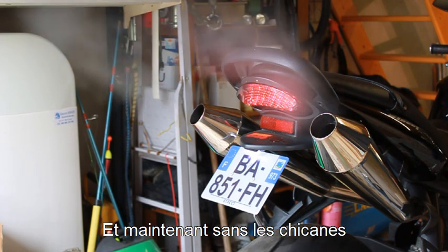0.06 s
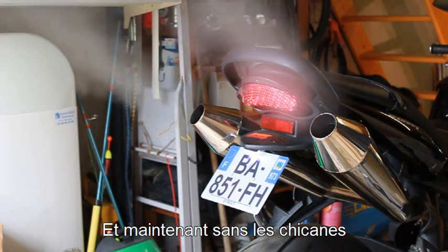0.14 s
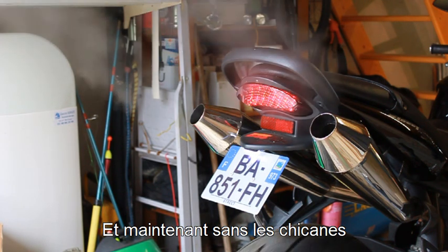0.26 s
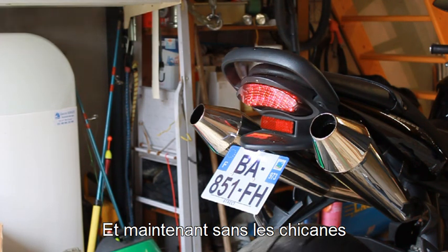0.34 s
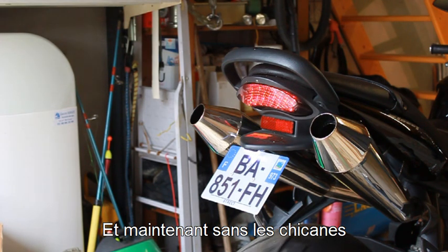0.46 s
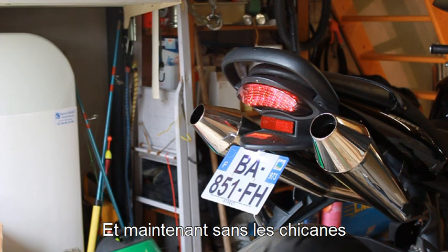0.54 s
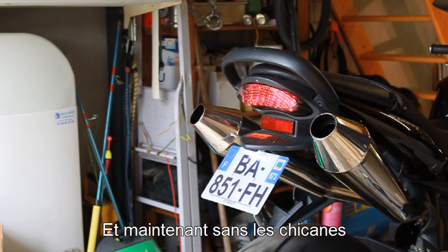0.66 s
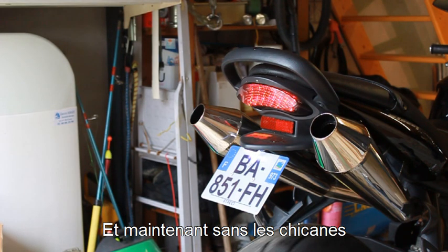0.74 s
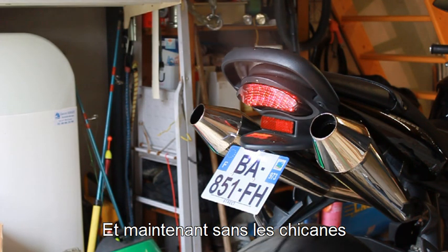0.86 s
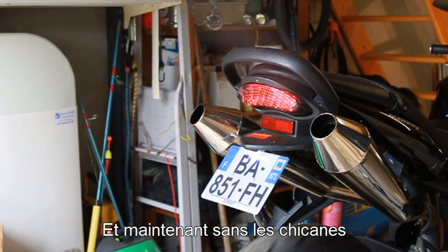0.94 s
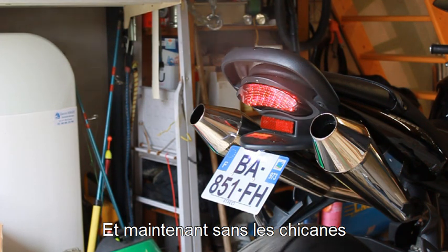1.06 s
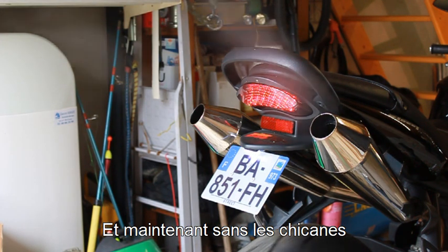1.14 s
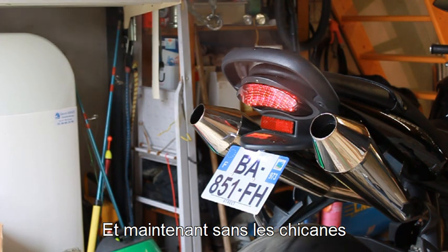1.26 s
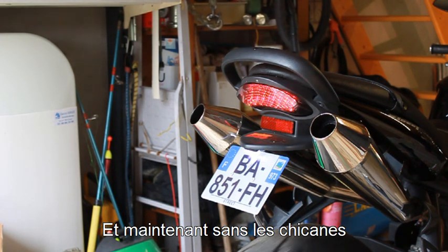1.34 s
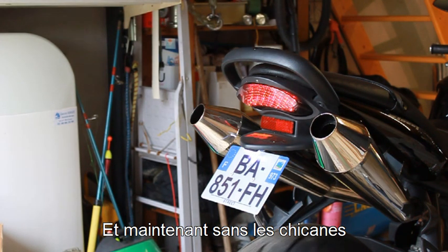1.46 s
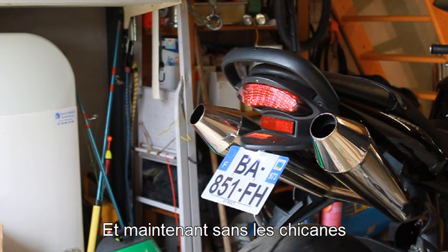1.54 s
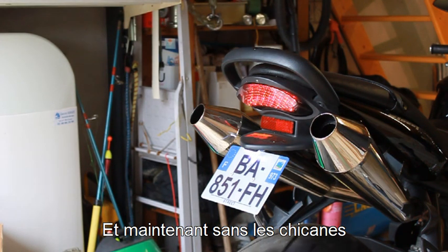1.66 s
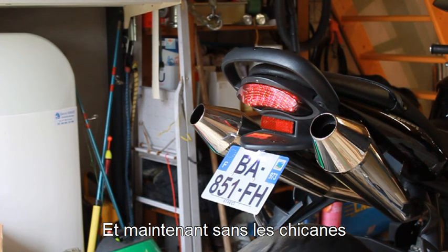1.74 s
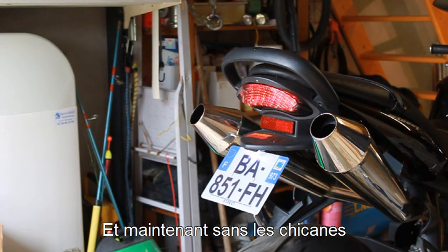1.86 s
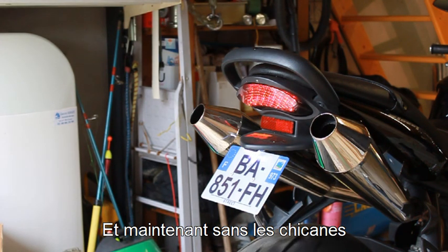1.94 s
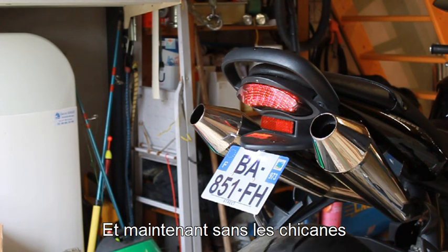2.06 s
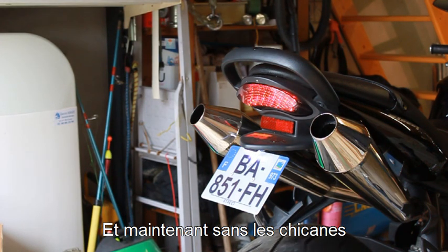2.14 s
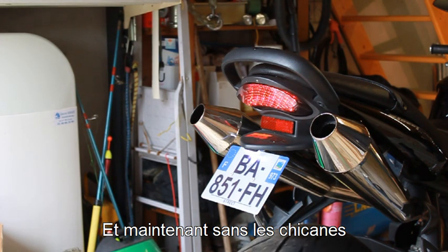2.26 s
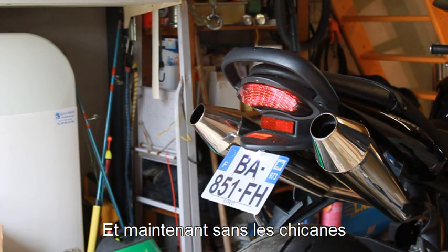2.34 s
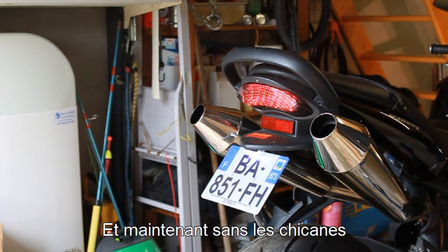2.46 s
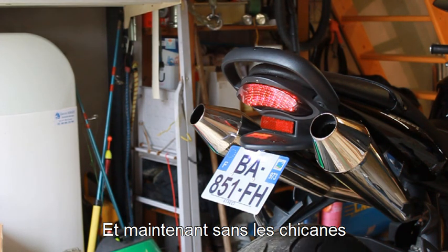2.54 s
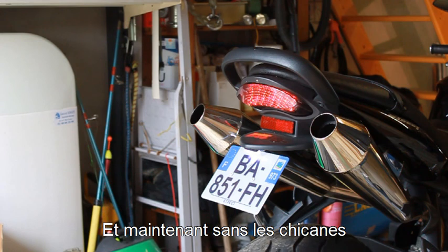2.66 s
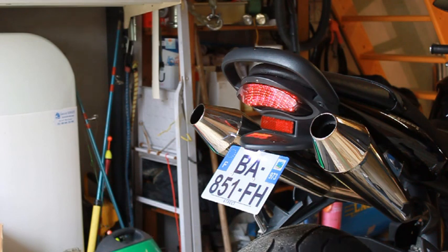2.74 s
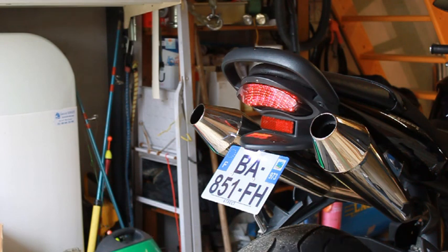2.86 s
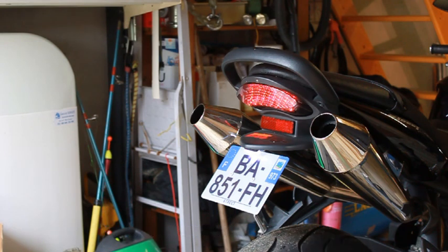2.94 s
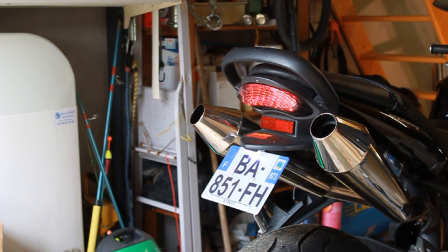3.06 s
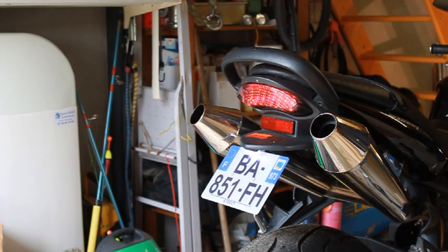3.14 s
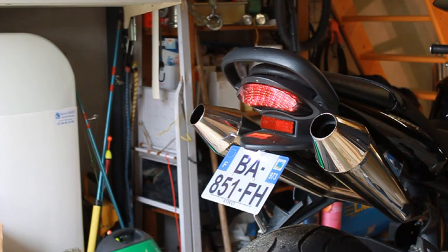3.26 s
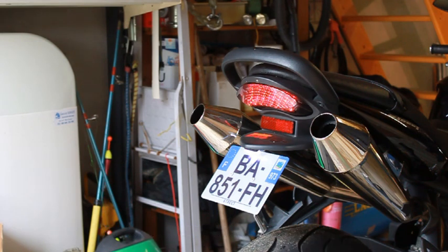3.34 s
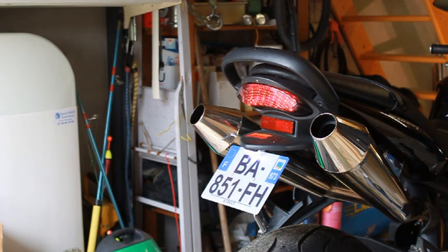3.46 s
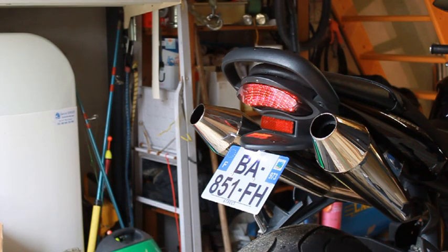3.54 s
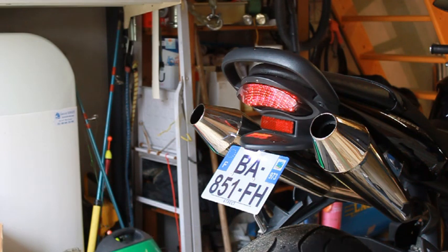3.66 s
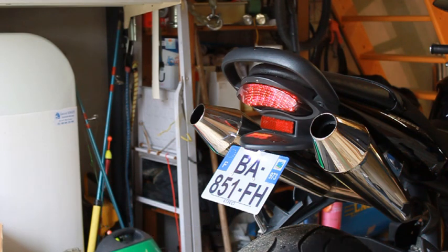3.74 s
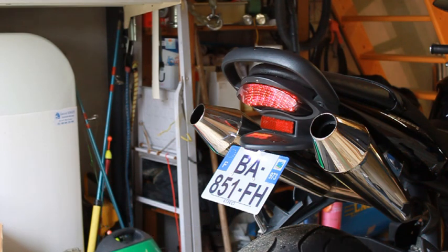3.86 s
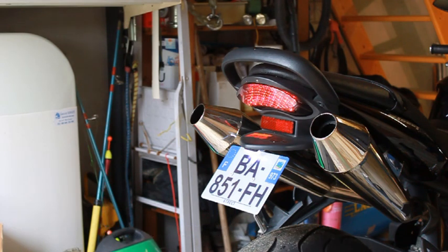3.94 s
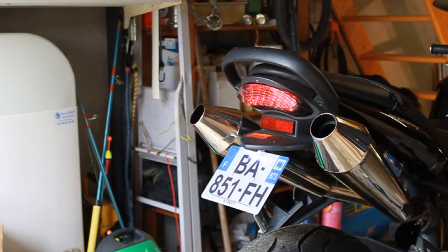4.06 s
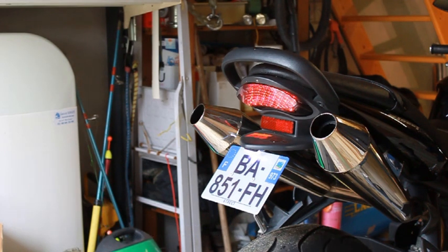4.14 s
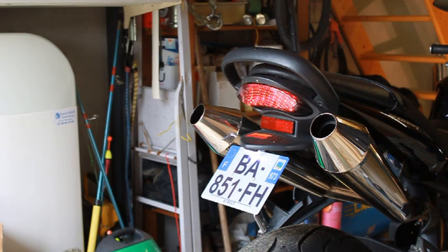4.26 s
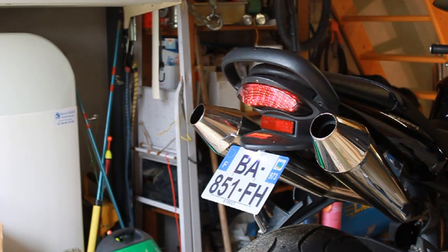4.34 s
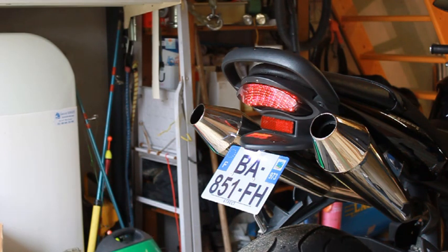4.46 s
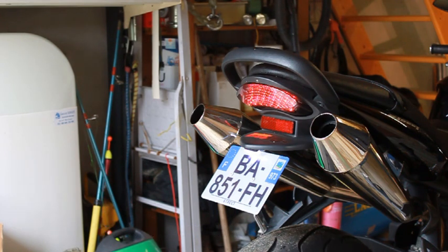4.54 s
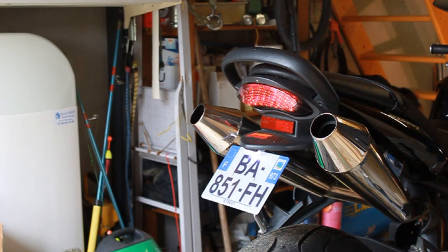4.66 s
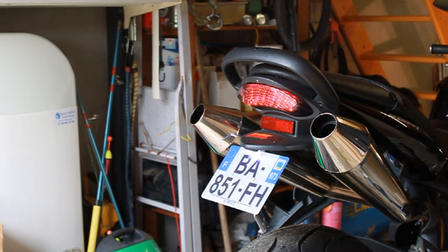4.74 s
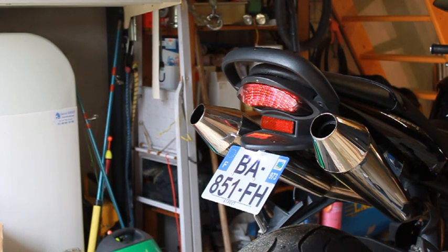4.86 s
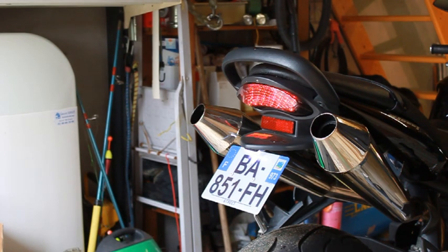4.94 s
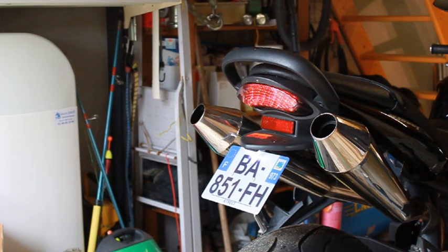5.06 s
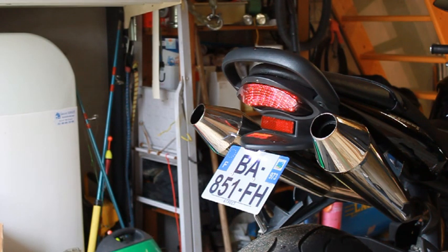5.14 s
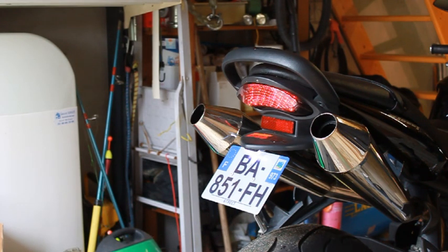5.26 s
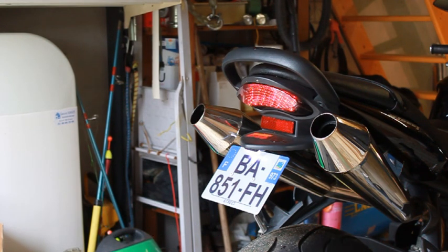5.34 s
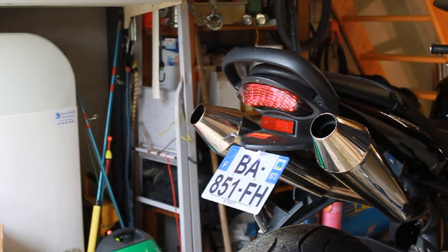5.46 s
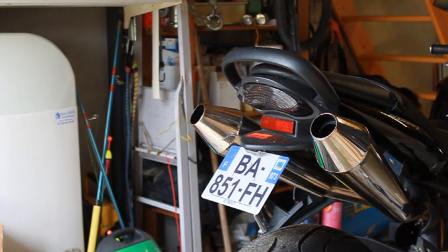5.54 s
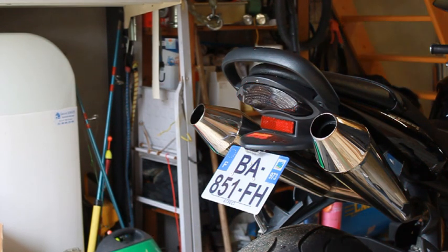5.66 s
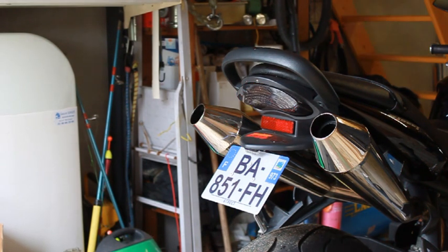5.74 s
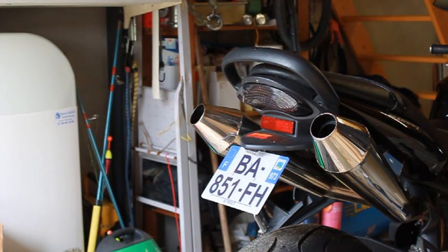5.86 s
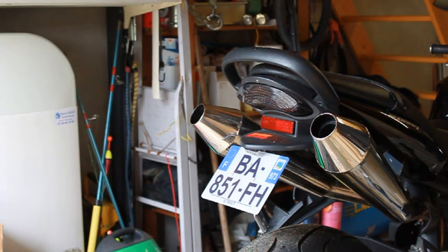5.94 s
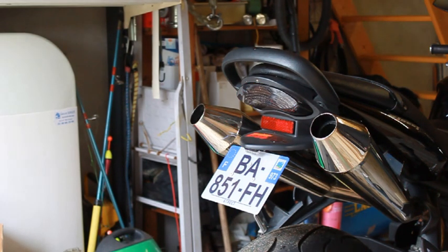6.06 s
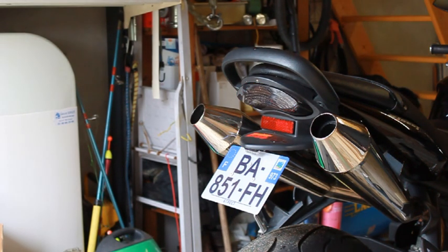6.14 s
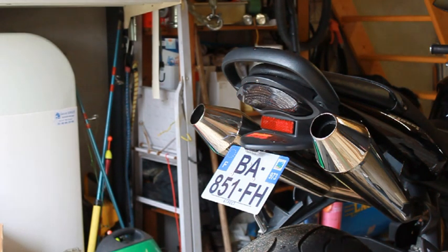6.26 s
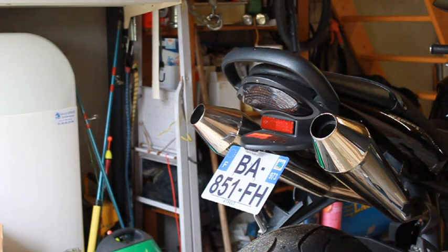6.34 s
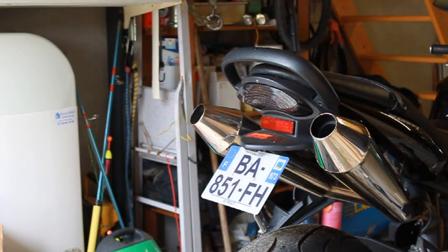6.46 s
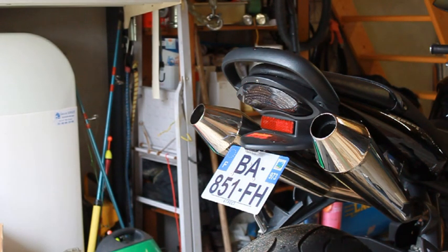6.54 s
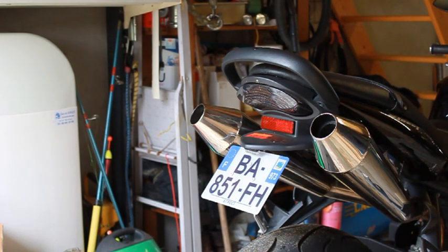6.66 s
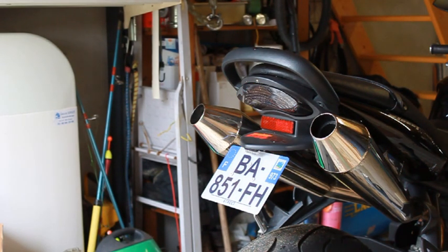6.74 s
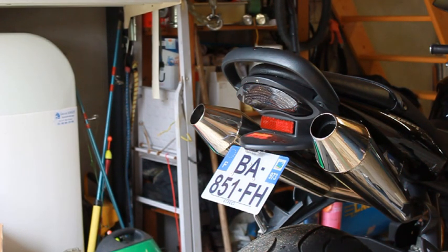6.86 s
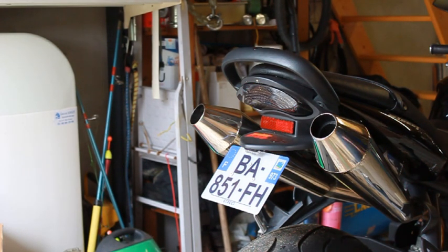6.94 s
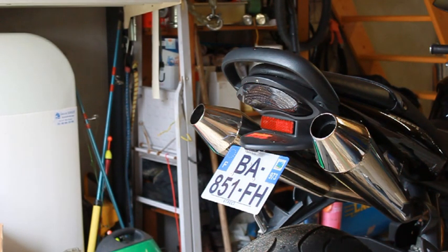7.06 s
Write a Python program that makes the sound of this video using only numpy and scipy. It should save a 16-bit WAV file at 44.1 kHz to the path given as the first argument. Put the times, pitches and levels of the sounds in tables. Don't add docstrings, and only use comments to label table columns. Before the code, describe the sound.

A three-cylinder motorcycle with open pipes, heard very close in a small reverberant garage. At 0 s it is already fast, the revs sinking until about 0.25 s. At 0.3 s the throttle snaps open: a raw, rasping roar climbs to its peak near 0.57 s, flattening the microphone, with hissing bursts of gas. From 0.8 s it coasts down, gears whining downward, and between 1.2 and 1.5 s six irregular pops and bangs crack in the pipes. By about 2 s it settles into a deep, lumpy idle, roughly 35 beats a second, hissing and buzzing with loose covers. At 5.63 s the ignition is cut; the beat sags into a low fluttering wheeze, and at 5.81 s a hard metallic knock chatters for a tenth of a second. Then near quiet: faint hum, thin squeaks, cloth rustles from 6.3 s, creaks, and a small tick with a sharper rustle near 7 s.

```python
import sys
import numpy as np
from scipy import signal
from scipy.fft import irfft
from scipy.io import wavfile
from scipy.ndimage import uniform_filter1d

SR = 44100
rng = np.random.default_rng(int(sys.argv[2]) if len(sys.argv) > 2 else 0)


def dump_mix(stems):
    frames = np.atleast_2d(stems).T
    limited = np.clip(frames, -1, 1)
    pcm = np.round(limited * 32767).astype(np.int16)
    wavfile.write(sys.argv[1], SR, pcm)


def how_loud(loudness_db):
    steps = np.asarray(loudness_db, float) / 20
    return 10 ** steps


N = 313530
T = np.arange(N) / SR

IDLE_HZ = 35.03
KEY_S, DYING_DB_PER_S = 5.633, 100
# frequency in Hz, level in dB per Hz.
RASP = [(280, -41), (480, 0.5), (937, -2), (1110, 2.5), (1270, -2.5), (1760, -20), (2200, -26),
        (2860, -28.5), (4840, -120)]


def evened(x):
    return x / np.sqrt(np.mean(x ** 2) + 1e-20)


def levelled(x, s):
    span = int(s * SR)
    power = uniform_filter1d(uniform_filter1d(x ** 2, span), span)
    return x / np.sqrt(abs(power) + 1e-3 * power.mean())


def curves(rows):
    s, *columns = np.transpose(rows)
    return [np.interp(T, s, c) for c in columns]


def read(points, hz):
    f, value = np.transpose(points)
    return np.interp(np.log(hz + 1), np.log(f + 1), value)


def humps(rows):
    return sum(np.exp(-((T - s) / length) ** 2) * np.array(heights)[:, None] for s, length, *heights in rows)


def gate(s, length, edge):
    opening = np.clip((T - s) / edge, 0, 1)
    closing = np.clip((s + length - T) / (3 * edge) + 1, 0, 1)
    return opening * closing


def clicks(events):
    out = np.zeros(N)
    for s, db in events:
        out[round(s * SR)] = how_loud(db)
    return out


def colour(x, points):
    db = np.maximum(read(points, abs(np.fft.fftfreq(8192, 1 / SR))), -100)
    log_gain = signal.hilbert(db * np.log(10) / 20)
    response = np.fft.ifft(np.exp(np.conj(log_gain))).real[:4096]
    return signal.oaconvolve(x, response)[:N]


def resonate(x, hz, width):
    turn = np.exp(2j * np.pi * np.cumsum(hz * np.ones(N)) / SR)
    r = np.exp(-np.pi * width / SR)
    return 2 * (turn * signal.lfilter([1 - r], [1, -r], x / turn)).real


def garage(x):
    # frequency in Hz, reverberation time in s.
    walls = [(100, 0.17), (400, 0.79), (2000, 0.38), (8000, 0.18)]
    taps, at = np.zeros(SR), np.arange(200, SR - 20, 20)
    taps[at + rng.integers(0, 20, len(at))] = rng.choice([-1., 1.], len(at))
    hz, t, z = signal.stft(taps, SR, nperseg=512)
    decay = how_loud(-60 * t / read(walls, hz)[:, None])
    tail = signal.istft(z * decay, SR, nperseg=512)[1]
    return signal.fftconvolve(x, tail / np.linalg.norm(tail))[:N]


def pipes(x):
    # frequency in Hz, width in Hz, level in dB.
    modes = [(67.8, 33, -4.5), (106.7, 13, 4), (135.6, 26.5, 2), (175.7, 12, 1.5), (215.64, 20.4, 5),
             (248.7, 24.3, 3.5), (280.6, 8.8, 1.5), (316.2, 28, -2), (364.5, 38, -3.5), (408.4, 51, -12.5)]
    # frequency in Hz, width in Hz, depth in dB.
    nulls = [(190, 12, -24), (234, 9, -14), (271, 8, -12), (340, 9, -12)]
    # frequency in Hz, delay in s.
    lag = [(50, .016), (70, .011), (88, .011), (123, .021), (158, .0215), (194, .0065), (229, .035),
           (264, .011), (299, .0105), (334, .0137), (370, .002), (405, .012)]
    hz = abs(np.fft.fftfreq(32768, 1 / SR))
    power = sum(how_loud(2 * db) / (1 + (2 * (hz - f) / width) ** 2) ** 2 for f, width, db in modes)
    for f, width, db in nulls:
        power = power * (1 - (1 - how_loud(2 * db)) / (1 + (2 * (hz - f) / width) ** 2))
    power = power / (1 + (hz / 440) ** 16) + 1e-9
    causal = np.exp(np.conj(signal.hilbert(np.log(power) / 2)))[:16385]
    late = np.exp(-2j * np.pi * np.cumsum(read(lag, hz[:16385])) * hz[1])
    before = x[4000:0:-1]
    response = irfft(causal * late)[:12000]
    return signal.oaconvolve(np.append(before, x), response)[4000:][:N]


def quiet():
    # frequency in Hz, level in dB per Hz.
    hum_colour = [(18, -61), (30, -27.5), (151, -15.5), (221, -10.5), (324, -28), (402, -6.5), (467, -14),
                  (600, -8.5), (809, -12), (1600, -15.5), (2080, -54), (3520, -120)]
    # frequency in Hz, level in dB per Hz.
    rustle_colour = [(710, -12.5), (1200, -10), (2980, -12.5), (3320, -13), (3660, -12.5), (5590, -14.5),
                     (5780, -17), (16000, -21)]
    # frequency in Hz, width in Hz, level in dB.
    hum_peaks = [(226, 20, -1), (360, 14, 3), (410, 14, -2), (493, 16, -3), (575, 14, 1)]
    # start in s, length in s, level in dB.
    brushes = [
        (6.315, .15, -70),
        (6.385, 0.018, -70),
        (6.485, .065, -59),
        (6.93, 0.045, -63),
        (7.031, 0.011, -55),
        (7.046, .045, -56),
    ]
    # start in s, hum in dB, rustle in dB, decay in dB a second.
    settling = [
        (5.62, -40.5, -47, 76),
        (5.815, -41, -35, 147),
    ]
    # start in s, length in s, start pitch in Hz, end pitch in Hz, level in dB.
    squeaks = [
        (6.177, 0.17, 8700, 8400, -81.5),
        (6.264, .05, 7230, 7600, -74),
        (6.41, 0.099, 4180, 4080, -70),
        (6.544, 0.17, 4000, 3930, -77),
        (6.31, 0.039, 900, 880, -64),
        (6.37, .05, 1050, 1033, -66),
        (6.673, 0.087, 720, 722, -68),
        (6.985, .035, 630, 610, -52),
    ]
    hum_size = how_loud(-70) + how_loud(-67) * gate(6.52, 1, 0.027)
    rustle_size = how_loud(-73.5) + how_loud(-71.5) * gate(6.32, 1, 0.0077)
    rustle_size = rustle_size + sum(how_loud(db) * gate(s, length, .004) for s, length, db in brushes)
    for s, low_db, high_db, fall_db in settling:
        dying = gate(s, 1, .004) * how_loud(-fall_db * np.maximum(T - s, 0))
        hum_size = hum_size + how_loud(low_db) * dying
        rustle_size = rustle_size + how_loud(high_db) * dying

    noise = rng.standard_normal((3, N))
    tones = sum(how_loud(db) * evened(signal.lfilter(*signal.iirpeak(hz, hz / width, SR), noise[0]))
                for hz, width, db in hum_peaks)
    hum = evened(evened(colour(noise[0], hum_colour)) + how_loud(-3) * evened(tones))
    grains = how_loud(0.83 * evened(uniform_filter1d(noise[2], 150)))
    out = hum_size * hum + rustle_size * evened(colour(grains * noise[1], rustle_colour))
    for s, length, hz, end_hz, db in squeaks:
        u = np.arange(0, 1, 1 / (length * SR))
        phase = 2 * np.pi * np.cumsum(hz + (end_hz - hz) * u) / SR
        out[round(s * SR):][:len(u)] += how_loud(db) * np.sin(np.pi * u) ** 0.21 * np.sin(phase)
    return out


def wheeze():
    u = np.clip((T - 5.62) / 0.48, 0, 1)
    noise = rng.standard_normal(N)
    breath = evened(resonate(resonate(noise, 40, 18), 40, 18))
    flutter = how_loud(-32 - 22 * u) * np.sin(np.pi * u) ** 1.5 * breath
    low_band = signal.butter(2, [45, 100], "band", fs=SR, output="sos")
    return flutter + how_loud(-74) * evened(signal.sosfilt(low_band, noise))


def kick_back():
    # time in s, peak in dB.
    knocks = [
        (5.8105, -19.5),
        (5.8145, -13.5),
        (5.8294, -22.5),
        (5.8444, -20.5),
        (5.8594, -20),
        (5.8794, -19.5),
        (5.8944, -21.5),
        (5.9144, -36.5),
        (7.029, -45.5),
    ]
    # frequency in Hz, level in dB, decay time to -60 dB in s (at most 0.08 is
    casing = [(1010, -15.5, 0.22), (1580, -5.5, 0.38), (1780, -9, 0.55), (1870, -17, 0.59),
              (2120, -14.5, 0.39), (2280, -20.5, 1.7), (2330, -14.5, 0.056), (2507, -3, 0.17),
              (2960, -50, 5.0), (3340, -20, 0.22), (3470, -12.5, 0.087), (4285, -40, 5.0),
              (4958, -31.5, 0.92), (7400, -21.5, 0.24)]
    # frequency in Hz, level in dB per Hz.
    clatter = [(180, -51.5), (300, -40.5), (433, -8.5), (801, -43), (946, -9), (1970, 1), (4440, -12),
               (5430, -21), (12700, -30), (16000, -32.5)]
    blows, t = clicks(knocks), T[:8000]
    ring = sum(how_loud(db - 60 * t / min(t60, .08)) * np.sin(2 * np.pi * hz * t) for hz, db, t60 in casing)
    rung = signal.oaconvolve(blows, ring)[:N]
    shaking = signal.oaconvolve(blows, how_loud(-60 * t / 0.16))[:N]
    shake = colour(shaking * rng.standard_normal(N), clatter)
    both = how_loud(-4) * evened(rung) + evened(shake)
    both = both + how_loud(-11.5) * garage(both)
    return how_loud(np.max(knocks, 0)[1] + 2.0) * both / abs(both).max()


def backfires():
    # time in s, peak in dB.
    pops = [
        (1.182, -11),
        (1.265, -7),
        (1.366, -15.5),
        (1.445, -8.5),
        (1.464, -13),
        (1.489, -7.5),
    ]
    bangs = clicks(pops)
    thud = np.roll(pipes(bangs), -round(.011 * SR))
    burst = signal.lfilter([1], [1, -.996], bangs)
    ragged = colour(burst * rng.standard_normal(N), RASP)
    both = how_loud(1.5) * thud / abs(thud).max() + how_loud(-7) * ragged / abs(ragged).max()
    return how_loud(np.max(pops, 0)[1]) * both


def crank():
    # time in s, rate in firings a second.
    blip = [
        (0, 216),
        (.1, 197),
        (.26, 152),
        (.315, 158),
        (.4, 208),
        (.52, 300),
        (.57, 316),
        (.62, 303),
        (.8, 251.5),
    ]
    # time in s, level in dB.
    burn = [(0, -9.5), (.12, -7.5), (.25, -15.5), (.31, 5.5), (.4, 1), (.5, 14), (.57, 5.5), (.63, 3),
            (.93, -4.5), (1.1, -11.5), (1.2, -17), (1.5, -21), (1.86, -22), (1.97, -17.5), (2.03, -23.5),
            (2.08, -19.5), (2.8, -16.5), (5.6, -17)]
    # time in s, length in s, speed change in Hz, burn
    # change in dB.
    hunts = [(2.24, 0.077, -0.75, -0.5), (2.36, 0.058, 0.81, 1), (2.98, 0.091, 0.11, 1.5),
             (3.24, 0.11, 1.04, 3), (3.63, 0.074, -1.02, -0.5), (3.8, 0.094, 1.02, 2), (4.45, .2, -0.27, 1),
             (4.68, 0.071, 0.21, 2), (4.86, .09, .9, 1.5), (5.28, 0.071, 0.63, 3), (5.42, 0.047, -1.7, 0),
             (5.56, 0.069, 1.84, 2), (5.665, 0.039, -0.47, -6.5), (5.78, 0.042, -0.17, -11)]
    drag_per_s, friction_hz, spin_down_hz_per_s = 1.3, 20, 135
    hunt_hz, hunt_db = humps(hunts)
    shut_s, shut_hz = blip[-1]
    coast = (shut_hz + friction_hz) * np.exp(-drag_per_s * (T - shut_s)) - friction_hz
    rate_hz = np.where(T < shut_s, curves(blip)[0], np.maximum(coast, IDLE_HZ + hunt_hz))
    off = np.maximum(T - KEY_S, 0)
    rate_hz = np.maximum(rate_hz - spin_down_hz_per_s * off, 5)
    return rate_hz, curves(burn)[0] + hunt_db - DYING_DB_PER_S * off


def gears(turns, rate_hz):
    # multiple of the firing rate, fuzz as a share of pitch, level in dB.
    meshes = [(31.4, .055, 0), (63.5, .045, 0), (94, .04, -16)]
    whine = 0
    for multiple, fuzz, db in meshes:
        a, b = rng.standard_normal((2, 8000))
        wander = np.interp(turns * multiple * fuzz * 2, np.arange(8000), a + 1j * b)
        tone = (wander * np.exp(2j * np.pi * multiple * turns)).real
        audible = np.clip((6000 + 110000 / multiple - multiple * rate_hz) / 5500, 0, 1)
        whine = whine + how_loud(db) * evened(tone) * audible
    return whine * (1 + .2 * np.cos(2 * np.pi * turns / 3) + .3 * np.cos(2 * np.pi * turns))


def engine():
    cylinder_db = [1.3, -.3, -1]
    # frequency in Hz, level in dB per Hz.
    hiss_fast = [(880, -46), (1500, -2), (1830, -9), (2390, -2), (2640, -3.5), (4370, -6.5), (5770, -11.5),
                 (13400, -20), (16000, -24.5)]
    hiss_slow = [(880, -35), (1500, -6), (1810, -10), (2000, -3), (2270, -9), (2510, -6), (4870, -14.5),
                 (8000, -22), (14100, -21), (16000, -29.5)]
    # frequency in Hz, level in dB per Hz.
    crack_colour = [(260, -14), (440, -7.5), (596, 3), (673, -19), (768, 3.5), (971, -11), (2000, -11.5),
                    (2600, -44), (4400, -120)]
    # frequency in Hz, width in Hz, level in dB re hiss.
    shields = [(587, 37, -16), (860.4, 66, -6.5), (1478, 70, -17), (2001, 44, -7.5), (2365, 160, -8),
               (3296, 130, -14.5)]
    # time in s, length in s, extra hiss in dB.
    flares = [
        (.12, 0.022, 0.5),
        (.39, 0.01, 1),
        (.525, 0.0092, 1),
        (.58, 0.037, 6),
        (.66, 0.036, 6),
        (.74, 0.044, 6),
        (.85, 0.034, 3.5),
        (.98, 0.032, 3),
    ]
    # time in s, length in s, extra unevenness in
    # dB.
    misfires = [
        (0, .03, 6),
        (.4, .1, 1),
        (.595, .025, 4),
        (1.21, .04, 4),
        (1.36, .1, 2.5),
        (1.7, .2, 2.5),
        (5.75, .06, 3),
    ]
    # level in dB, share of the burn, dB per octave of speed above idle.
    rasp_law = (-25.5, .95, 4.9)
    hiss_law = (-28.5, 0.6, 6.74)
    whine_law = (-40, 0.083, 6.65)
    mouth_hz = [364.7, 421.5]
    idle_uneven_db, fast_uneven_db = 2.2, .4
    idle_sharp, fast_sharp = .15, .55

    rate_hz, boom_db = crank()
    octaves = np.log2(np.maximum(rate_hz / IDLE_HZ, 1))
    rasp_db, hiss_db, whine_db = (db + share * boom_db + slope * octaves
                                  for db, share, slope in (rasp_law, hiss_law, whine_law))
    hiss_db = hiss_db + humps(flares)[0]
    open_s, shut_s, loaded_db = .29, .74, -22.5
    whine_db = whine_db + loaded_db * gate(open_s, shut_s - open_s, 0.066)
    whine_db = whine_db - 0.44 * DYING_DB_PER_S * np.maximum(T - KEY_S, 0)

    turns = np.cumsum(rate_hz) / SR
    firing = turns.astype(int)
    chance = np.clip(rng.standard_normal(1000), -3, 1.8)[firing]
    fast = np.clip((rate_hz - 60) / 130, 0, 1)
    uneven_db = idle_uneven_db + (fast_uneven_db - idle_uneven_db) * fast + humps(misfires)[0]
    strength = how_loud(uneven_db * chance + (1 - fast) * np.take(cylinder_db, firing % 3))
    blasts = strength * (np.diff(firing, prepend=-1) > 0)
    wet = how_loud(-14) * garage(pipes(blasts))
    stray = (rng.random(N) < 90 / SR) * rng.standard_normal(N) * np.clip((uneven_db - 1.4) / 4, 0, 1.2)
    boom = how_loud(boom_db) * np.roll(levelled(pipes(blasts + stray) + wet, .12), -round(.022 * SR))
    mouth = signal.butter(2, mouth_hz, "band", fs=SR, output="sos")
    singing = evened(signal.sosfilt(mouth, blasts * how_loud(2.5 * chance)))
    boom += how_loud(boom_db - 10.5) * fast ** 2 * singing

    noise = rng.standard_normal((4, N))
    since_blast = (turns - .009 * rate_hz) % 1
    jet = strength ** .3 * (1.4 + np.exp(-since_blast / .2))
    sharp = np.clip(idle_sharp + (fast_sharp - idle_sharp) * fast, 0, 1)
    crack = levelled(colour(blasts + stray, crack_colour), .1)
    rush = levelled(colour(jet * noise[0], RASP), 0.02)
    rasp = how_loud(rasp_db) * (np.sqrt(sharp) * crack + np.sqrt(1 - sharp) * rush)
    hiss = np.sqrt(fast) * levelled(colour(jet * noise[1], hiss_fast), 0.053)
    hiss = hiss + np.sqrt(1 - fast) * levelled(colour(jet * noise[2], hiss_slow), 0.053)

    sag = np.clip(rate_hz / 34, .6, 1) ** 2.0
    covers = sum(how_loud(db) * evened(resonate(resonate(jet * noise[3], hz * sag, width), hz * sag, width))
                 for hz, width, db in shields)
    covers *= how_loud(-13 * np.clip((rate_hz - 37) / 10, 0, 1))
    running = np.clip((5.86 - T) / 0.0396, 0, 1)
    whine = how_loud(whine_db) * gears(turns, rate_hz)
    return running * (boom + rasp + how_loud(hiss_db + 1.0) * (hiss + covers) + whine)


def scene():
    return (engine() + backfires() + kick_back() + quiet() + wheeze())[None]


def top_cut(x):
    return signal.sosfilt(signal.butter(12, 16160, fs=SR, output="sos"), x)


def record(dry):
    flattened = dry / (1 + abs(dry) ** 6) ** (1 / 6)
    cut = signal.lfilter(*signal.butter(1, 150, "high", fs=SR), flattened)
    power_db = 10 * np.log10(abs(uniform_filter1d(cut ** 2, 4000)) + 1e-12)
    over_db = uniform_filter1d(np.maximum(power_db + 17.5, 0), 2000)
    return top_cut(cut / how_loud(0.72 * over_db))


dry = scene()
out = record(dry)
dump_mix(out)
```